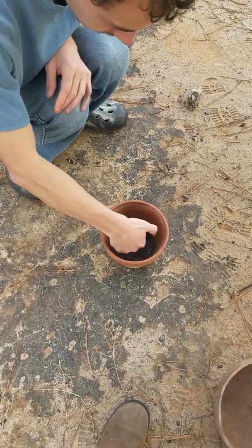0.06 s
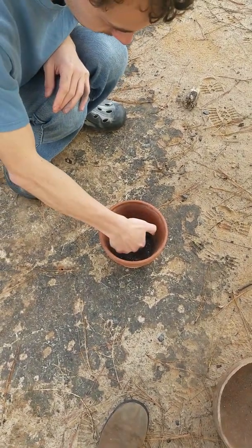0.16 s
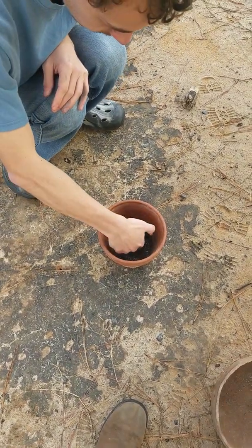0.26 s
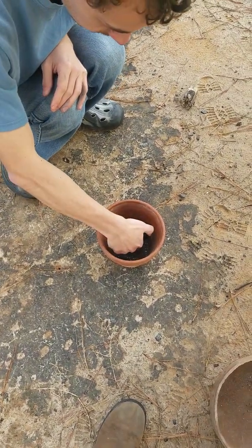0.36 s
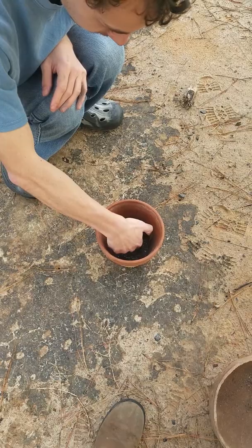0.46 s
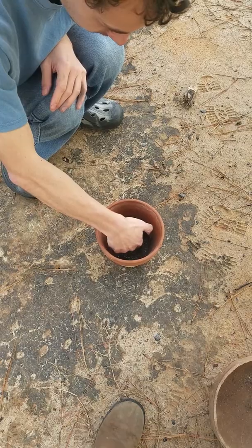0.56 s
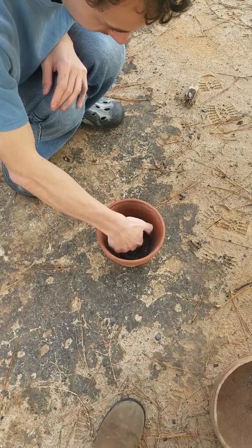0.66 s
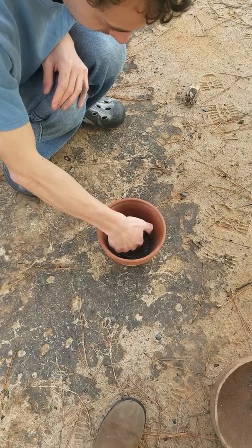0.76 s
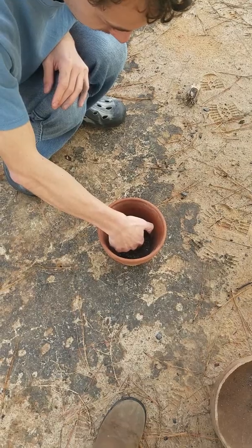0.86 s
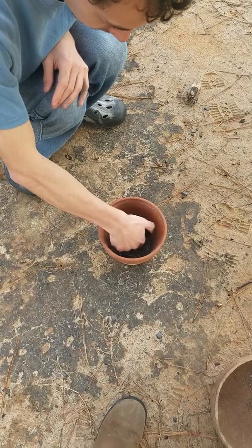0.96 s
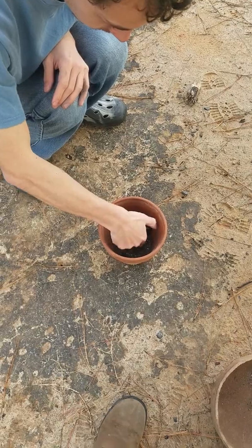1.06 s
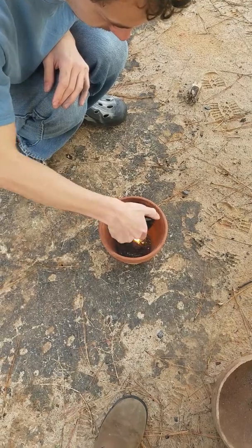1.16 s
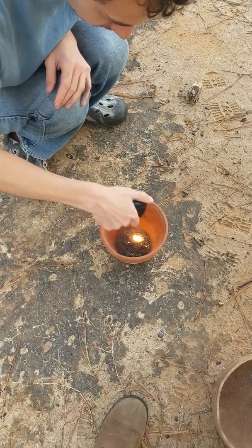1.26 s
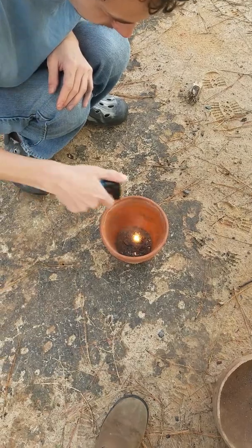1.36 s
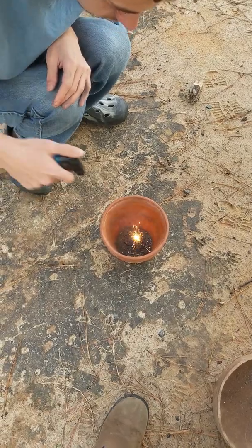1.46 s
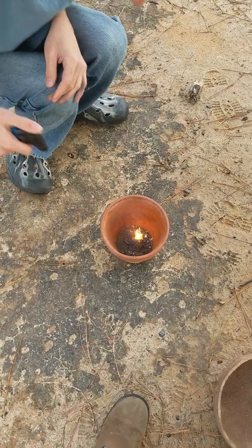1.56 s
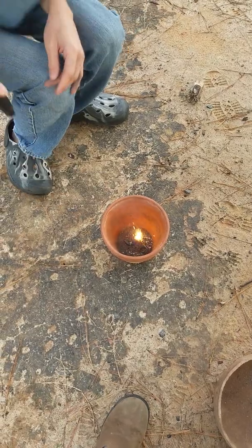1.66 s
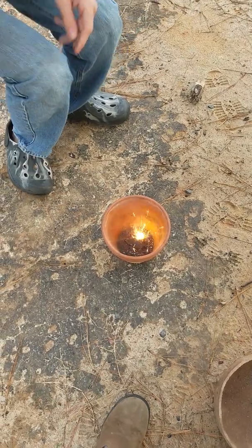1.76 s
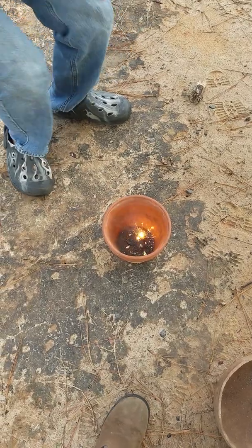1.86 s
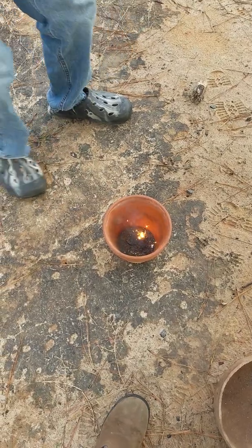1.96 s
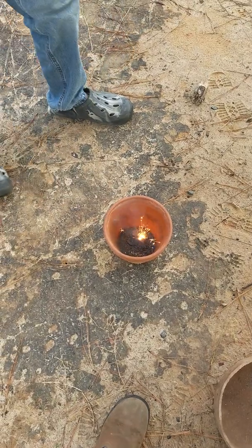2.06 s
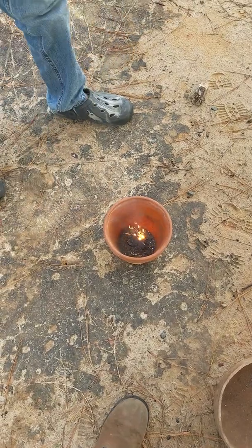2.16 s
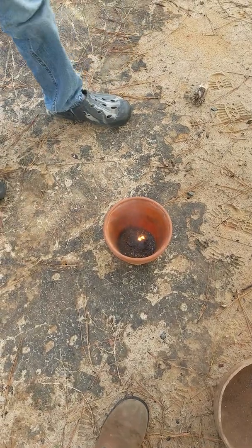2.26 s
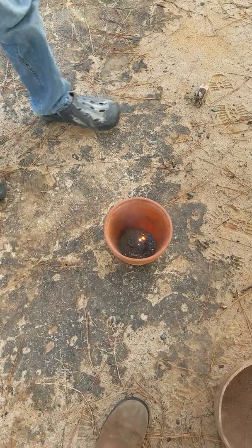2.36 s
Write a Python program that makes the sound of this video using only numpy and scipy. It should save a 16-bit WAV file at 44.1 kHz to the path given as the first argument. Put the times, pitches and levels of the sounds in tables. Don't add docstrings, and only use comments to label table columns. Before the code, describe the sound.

Powder burns weakly in a clay pot outdoors. Faint low rumble and air run throughout. Thin gas hiss starts at 0.12 s, a loud, bright igniter snap at 0.25, then soft flame roar until 1.03, when the button clicks back amid a low flutter. Fizz grows with ticks, pops and spits, strongest 1.65-2.2, while shoes scuff grit with brief rubs near 1.92 and 2.08, easing by 2.4.

```python
import sys
import numpy as np
from scipy import signal
from scipy.fft import rfft, irfft
from scipy.io import wavfile

SR = 44100
rng = np.random.default_rng(int(sys.argv[2]) if len(sys.argv) > 2 else 0)


def to_wav(sig):
    pcm = np.clip(np.atleast_2d(sig), -1, 1) * 32767
    pcm = np.round(pcm).astype(np.int16)
    wavfile.write(sys.argv[1], SR, pcm.T)


def elevation(decibels):
    levels = np.asarray(decibels, float)
    return 10 ** (levels / 20)


N = 105840
T = np.arange(N) / SR


def rms_one(x):
    return x / np.sqrt(np.mean(x ** 2) + 1e-20)


def in_time(rows):
    return np.interp(T, *np.transpose(rows))


def at_hz(points, hz):
    points = np.array(points)
    return np.interp(np.log(hz + 1), np.log(points[:, 0]), points[:, 1])


def bandpass(x, low_hz, high_hz, order=2):
    return signal.sosfilt(signal.butter(order, [low_hz, high_hz], "band", fs=SR, output="sos"), x)


def drift(rate):
    r = np.exp(-80 * np.pi * rate / SR)
    slow = signal.lfilter([1], [1, -2 * r, r * r], rng.standard_normal(N // 40 + 2002))
    slow = slow[2000:]
    return np.interp(np.arange(N) / 40, np.arange(len(slow)), rms_one(slow))


def ring(clicks, hz, t60):
    r = elevation(-60 / (t60 * SR))
    w = 2 * np.pi * hz / SR
    return signal.lfilter([0, np.sin(w)], [1, -2 * r * np.cos(w), r * r], clicks + 1e-18)


def dying(clicks, t60):
    return signal.lfilter([1], [1, -elevation(-60 / (t60 * SR))], np.abs(clicks) + 1e-18)


def colour(x, spectrum, peaks=()):
    hz = np.fft.rfftfreq(N, 1 / SR)
    resonances = sum(elevation(db) / (1 + (2 * (hz - f) / width) ** 2) for f, width, db in peaks)
    gain = elevation(at_hz(spectrum, hz)) * (1 + resonances)
    return irfft(rfft(x) * rms_one(gain), N)


def noise_pair():
    return rng.standard_normal((2, N))


def hiss(spectrum, patchy_db, rate, peaks=()):
    steady = rfft(colour(noise_pair(), spectrum, peaks))
    octave = np.log2(np.fft.rfftfreq(N, 1 / SR) + 1)
    shared = drift(rate / 3)
    out = 0
    for k in range(4, 16):
        band = irfft(steady * np.clip(1 - abs(octave - k), 0, 1), N)
        out = out + elevation(patchy_db * (shared + drift(rate))) * band
    return rms_one(out)


def strikes(rows):
    clicks = np.zeros(N)
    for s, db in rows:
        clicks[int(s * SR)] = elevation(db)
    return clicks


def grains(per_s, spread):
    size = elevation(spread * np.minimum(rng.exponential(1, (2, N)), 4.0))
    size = size * rng.choice([-1, 1], (2, N))
    return rms_one(size * (rng.random((2, N)) < per_s / SR))


def struck(rows, modes):
    clicks = strikes(rows)
    rings = 0
    for hz, db, t60 in modes:
        uneven = elevation(rng.normal(0, .7, (2, N))) * [[1], [.5]]
        rings = rings + elevation(db) * ring(clicks * uneven, hz, t60)
    too_small_below_hz = 1800
    return signal.sosfilt(signal.butter(3, too_small_below_hz, "high", fs=SR, output="sos"), rings)


# [f/Hz, level/dB]
RUMBLE = [(12, -52), (20, -15.5), (27, -15), (82, -0.5), (110, 0), (188, -14), (350, -22.5), (460, -36.5),
          (770, -120)]
# [t/s, level/dB]
SWELL = [(0, -51.5), (.4, -54), (.9, -53), (1.0, -48), (1.1, -51.5), (1.5, -49), (1.6, -52), (1.75, -48),
         (1.95, -49.5), (2.06, -47.5), (2.15, -50), (2.4, -50.5)]


def rumble():
    return elevation(in_time(SWELL)) * hiss(RUMBLE, patchy_db=-0.06, rate=10)


# [f/Hz, level/dB]
AIR = [(190, -40.5), (330, -13), (700, -14.5), (1800, -19.5), (3500, -25.5), (9000, -41), (16000, -25.5)]


def air():
    level_db = -65.5
    return elevation(level_db) * hiss(AIR, patchy_db=1.5, rate=15)


# [f/Hz, level/dB]
GAS = [(2060, -47), (4300, -21.5), (4900, -6), (7900, -7), (9200, -13), (11000, -7.5), (16000, -13.5)]
# [f/Hz, width/Hz, level/dB]
GAS_PEAKS = [(7600, 900, -2), (11500, 1200, 0), (13200, 500, -2)]


def gas():
    on_s, edge_s, lit_s, fade_s_per_10_db = 0.12, 0.0088, 0.31, 0.034
    level_db, flare_db = -66.5, 7
    db = level_db + flare_db * (T > SNAP[1][0])
    db = db - 10 / fade_s_per_10_db * np.maximum(T - lit_s, 0)
    opening = np.clip((T - on_s) / edge_s, 0, 1)
    return elevation(db) * opening * hiss(GAS, patchy_db=.5, rate=20, peaks=GAS_PEAKS)


# [f/Hz, level/dB]
JET = [(250, -49.5), (350, -15), (540, -4), (1090, -7), (1680, -1.5), (2500, -8.5), (4000, -28.5),
       (9500, -36)]
# [f/Hz, width/Hz, level/dB]
JET_PEAKS = [(1660, 150, -11.5), (12000, 830, 10), (13450, 1200, 12)]


def jet():
    on_s, rise_s, off_s, fall_s = 0.235, 0.015, 1.035, 0.013
    level_db, sag_db_per_s = -53.5, -2.5
    env = np.clip((T - on_s) / rise_s, 0, 1) * np.clip((off_s - T) / fall_s + 1, 0, 1)
    roar = hiss(JET, patchy_db=-1.0, rate=57, peaks=JET_PEAKS)
    return elevation(level_db + sag_db_per_s * (T - on_s)) * env * roar


# [t/s, peak level/dB]
SNAP = [
    (.2457, -18.5),
    (.2462, -5),
    (.2476, -17),
    (.2492, -38),
]
# [f/Hz, level/dB, t60/s]
SNAP_MODES = [(2270, -6, .013), (3460, -5, .022), (4955, -5, .022), (5870, -11, .022), (6460, -5, .022),
              (6810, -11, .02), (8080, -1, .015), (9100, -7, .02), (9570, -10, .018), (10040, -7, .03),
              (10690, -9, .018), (12080, -6, .02), (12700, -14, .018), (13400, -9, .012)]
# [f/Hz, level/dB]
SNAP_CRACK = [(500, -40.5), (1500, -21.5), (2300, -15), (2950, -14.5), (4200, -9.5), (5500, -10),
              (9000, -7.5), (16000, -14.5)]
# [f/Hz, level/dB]
SNAP_TAIL = [(800, -30.5), (2300, -4), (4250, -15), (4900, 0.5), (8000, -7.5), (9300, -15), (12000, -21),
             (16000, -15)]
# [f/Hz, level/dB, t60/s]
THUMP = [(280, -37, 0.022), (390, -31, 0.014), (740, -32, 0.0155)]


def igniter():
    ring_db = -11
    crack_db, crack_t60_s = -7, 0.0085
    tail_db, tail_t60_s = -37.5, 0.094
    clicks = strikes(SNAP)
    tail = elevation(tail_db) * dying(clicks, tail_t60_s) * colour(noise_pair(), SNAP_TAIL)
    body = elevation(ring_db) * struck(SNAP, SNAP_MODES)
    crack = elevation(crack_db) * dying(clicks, crack_t60_s) * colour(noise_pair(), SNAP_CRACK)
    even = clicks / clicks.max()
    thump = sum(elevation(db) * ring(even, hz, t60) for hz, db, t60 in THUMP) * [[1], [.5]]
    return bandpass(thump, 170, 850, order=3) + tail + body + crack


# [t/s, level/dB]
SCUFF = [(.3, -73.5), (1.05, -63), (1.2, -55.5), (1.3, -54), (1.44, -55.5), (1.58, -54.5), (1.66, -49),
         (1.75, -48.5), (1.8, -55), (1.87, -45), (1.91, -52.5), (1.95, -48), (1.99, -60), (2.05, -50),
         (2.14, -48.5), (2.2, -52), (2.28, -56.5), (2.4, -63)]
# [f/Hz, level/dB]
GRIT = [(240, -29.5), (400, -4), (608, 3), (957, 1), (2260, -2.5), (6000, -21), (7800, -31), (13200, -120)]
# [f/Hz, width/Hz, level/dB]
GRIT_PEAKS = [(2300, 140, -2.5), (3290, 270, 2)]
# [t/s, length/s, level/dB, f/Hz]
TWISTS = [
    (1.921, .055, -44.5, 1500),
    (2.079, 0.046, -43, 1293),
]


def shoes():
    grains_per_s, grain_share = 1500, 0.51
    loose = colour(grains(grains_per_s, spread=4.3), GRIT, GRIT_PEAKS)
    rustle = hiss(GRIT, patchy_db=3.0, rate=37, peaks=GRIT_PEAKS)
    drag = grain_share * loose + (1 - grain_share) * rustle
    out = elevation(in_time(SCUFF)) * rms_one(drag)

    rub_hz, steady, sag = 200, 1.2, .33
    rub = rms_one(signal.sosfilt(signal.butter(2, rub_hz, fs=SR, output="sos"), noise_pair()))
    for s, length, db, hz in TWISTS:
        u = np.clip((T - s) / length, 0, 1)
        tone = np.sin(2 * np.pi * np.cumsum(hz * (1 - sag * u)) / SR)
        out += elevation(db) * np.sin(np.pi * u) ** .5 * (steady + rub) / 2 * tone
    return out


# [t/s, level/dB]
BURN = [(.6, -81), (.85, -67.5), (.95, -62), (1.06, -70), (1.11, -62), (1.2, -62.5), (1.3, -55),
        (1.41, -57), (1.46, -51), (1.58, -52), (1.68, -49), (1.85, -48.5), (1.95, -49.5), (2.0, -52),
        (2.1, -48), (2.25, -55.5), (2.31, -53), (2.4, -60.5)]
# [f/Hz, level/dB]
FIZZ = [(290, -30.5), (500, -3.5), (2260, -3.5), (5800, -7.5), (12000, -8.5), (16000, -12)]
# [f/Hz, width/Hz, level/dB]
FIZZ_PEAKS = [(2300, 170, -7.5), (7390, 900, -0.5), (11500, 1300, -4), (13300, 800, -6)]


def burn():
    sparks_per_s, spark_db, spark_spread_db, spark_clump_db = 1800, -4, 4.6, 3
    vigour_db = in_time(BURN)
    fizz = hiss(FIZZ, patchy_db=1.36, rate=7, peaks=FIZZ_PEAKS)
    clumps = elevation(spark_db + spark_clump_db * drift(25.6))
    sparks = clumps * colour(grains(sparks_per_s, spread=spark_spread_db), FIZZ, FIZZ_PEAKS)
    both = fizz + sparks

    sizzle_hz, follows, pivot_db = 9050, 0.13, -52
    top = signal.sosfiltfilt(signal.butter(2, sizzle_hz, "high", fs=SR, output="sos"), both)
    both = both + (elevation(follows * (vigour_db - pivot_db)) - 1) * top

    notch_hz, notch_width_hz, notch_depth = 5750, 500, .92
    fill_s, fill_width_s = 2.21, 0.11
    cancelled = signal.lfilter(*signal.iirpeak(notch_hz, notch_hz / notch_width_hz, SR), both)
    open_share = 1 - np.exp(-((T - fill_s) / fill_width_s) ** 4)
    return elevation(vigour_db) * (both - notch_depth * open_share * cancelled)


# [f/Hz, level/dB]
EMBER = [(350, -24), (520, 5), (800, -5.5), (1800, -12), (3000, -36)]


def ember():
    level_db, peak_s, slope_db_per_s = -61.5, 1.065, 91
    db = level_db - slope_db_per_s * np.abs(T - peak_s)
    return elevation(db) * hiss(EMBER, patchy_db=4.5, rate=20)


# [t/s, peak level/dB, f/Hz, puff level/dB]
CRACKLES = [(0.95, -39, 2200, -45), (1.3048, -38, 2300, -40), (1.46, -30.5, 2300, -37),
            (1.682, -31, 1690, -44.5), (1.811, -31, 4560, -39), (1.878, -30, 1970, -33.5),
            (1.9014, -20, 4270, -63), (1.965, -30, 990, -48), (2.133, -31.5, 2180, -38),
            (2.178, -55, 2000, -43), (2.244, -35, 960, -38), (2.26, -34.5, 930, -44)]
# [f/Hz, level/dB]
PUFF = [(400, -10), (1000, 5), (3500, -4), (8000, -11), (16000, -21)]


def crackles():
    ring_cycles, puff_t60_s = 14.5, 0.016
    out = np.zeros((2, N))
    for s, db, hz, _ in CRACKLES:
        soft = signal.lfilter(*signal.iirpeak(hz, 2, SR), strikes([(s, db - 2.0)]) + 1e-18)
        out += ring(soft, hz, ring_cycles / hz) * [[1], [.4]]
    puffs = strikes([(s, puff_db) for s, _, _, puff_db in CRACKLES])
    return out + colour(noise_pair(), PUFF) * dying(puffs, puff_t60_s)


# [t/s, peak level/dB]
RELEASE = [
    (1.0265, -34),
    (1.0273, -34),
    (1.0277, -25.5),
    (1.0398, -39.5),
]
# [f/Hz, level/dB, t60/s]
BUTTON = [(2500, 0.5, 0.006), (2890, -5.5, 0.014), (5200, -12, 0.013)]
# [f/Hz, level/dB]
LATCH = [(3800, -32), (5300, 5), (8000, -1), (13000, -9), (16000, -18)]


def button():
    latch_s, latch_db, latch_t60_s = 1.0281, -34, 0.013
    rattle = dying(strikes([(latch_s, latch_db)]), latch_t60_s) * colour(noise_pair(), LATCH)
    return struck(RELEASE, BUTTON) + rattle


# [t/s, peak level/dB, centre f/Hz]
TICKS = [(1.104, -50.5, 3370), (1.248, -41, 5000), (1.3043, -36, 2800), (1.3375, -38, 11500),
         (1.362, -46, 12000), (1.459, -36.5, 10000), (1.524, -36, 11000), (1.6822, -32, 2500),
         (1.695, -34, 10000), (1.736, -34, 3300), (1.756, -41, 3000), (1.765, -41, 10000),
         (1.771, -39, 12000), (1.8118, -33, 11600), (1.825, -35, 11000), (1.852, -33, 3000),
         (1.8525, -33, 13000), (1.904, -34, 7000), (1.948, -29, 1500), (1.985, -40, 5000),
         (1.999, -36, 10600), (2.0855, -46, 12000), (2.103, -43, 3000), (2.128, -33, 5500),
         (2.144, -32, 2000), (2.179, -36, 4000), (2.2455, -40, 1400), (2.263, -37, 1300), (1.88, -26, 2000),
         (1.8825, -39, 1700)]
# [t/s, length/s, level/dB, centre f/Hz]
SPITS = [(1.045, 0.11, -64, 12000), (1.105, 0.093, -70, 7400), (1.25, .14, -79, 12500),
         (1.283, 0.23, -64, 7300), (1.444, 0.22, -67, 12700), (1.51, 0.046, -55, 7600),
         (1.665, 0.15, -53.5, 3300), (1.837, 0.063, -54, 3600), (1.929, 0.028, -50, 7600),
         (1.993, 0.088, -53.5, 11500), (2.11, 0.032, -62, 5800), (2.29, 0.042, -55.5, 6800)]


def spits():
    tick_db, tick_q, tick_t60_s, spit_q = 7, 1, .004, 3
    noise = noise_pair()
    out = np.zeros((2, N))
    for s, db, hz in TICKS:
        click = strikes([(s, db + tick_db)])
        burst = click * [[1], [.5]] + .5 * noise * dying(click, tick_t60_s)
        out += signal.lfilter(*signal.iirpeak(hz, tick_q, SR), burst)
    for s, length, db, hz in SPITS:
        band = bandpass(noise, hz * (1 - .5 / spit_q), hz * (1 + .5 / spit_q))
        swell = np.sin(np.pi * np.clip((T - s) / length, 0, 1))
        out += elevation(db) * swell * rms_one(band)
    return out


def ports(pair, like, balance, phase=((1, 0), (2, 0))):
    hz = np.fft.rfftfreq(N, 1 / SR)
    mid, side = rfft(pair)
    c = np.clip(at_hz(like, hz), 0, 1)
    mid, side = np.sqrt(1 + c) * mid, np.sqrt(1 - c) * side
    tilt = elevation(at_hz(balance, hz) / 2) * np.exp(.5j * at_hz(phase, hz))
    return irfft(np.array([(mid + side) * tilt, (mid - side) / tilt]), N) / np.sqrt(2)


# [f/Hz, likeness/1]
NEAR_LIKE = [(60, 0.56), (380, 0.92), (2380, 0.64), (15000, -0.067)]
FAR_LIKE = [(60, 1), (380, 0.81), (2380, 0.02), (15000, 0.07)]
# [f/Hz, level/dB]
NEAR_BALANCE = [(60, 0), (380, -5.5), (2380, -7), (15000, -12.5)]
FAR_BALANCE = [(60, -1.5), (950, -3.5), (15000, 8)]
SNAP_BALANCE = [(60, -3), (180, -18), (550, -20.5), (1650, -16.5), (4970, -11.5), (15000, -12)]
# [f/Hz, phase/rad]
NEAR_PHASE = [(0, 0), (4310, 0.5), (6800, 6), (15400, 9), (16700, 15.5)]


def scene():
    near = gas() + jet() + burn() + crackles() + spits() + shoes() + button() + ember()
    far = rumble() + air()
    near = ports(near, NEAR_LIKE, NEAR_BALANCE, NEAR_PHASE)
    snap = ports(igniter(), NEAR_LIKE, SNAP_BALANCE)
    return near + snap + ports(far, FAR_LIKE, FAR_BALANCE)


def top_cut(x):
    return signal.sosfilt(signal.butter(12, 17100, fs=SR, output="sos"), x)


def record(dry):
    cutoff_hz = 15750
    mix = signal.sosfilt(signal.ellip(12, .5, 70, cutoff_hz, fs=SR, output="sos"), dry)
    return top_cut(mix)


dry = scene()
out = record(dry)
to_wav(out)
```